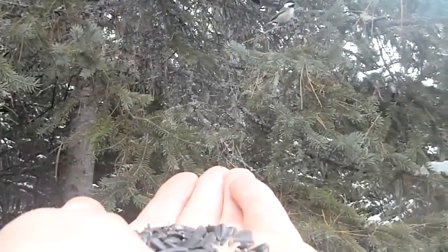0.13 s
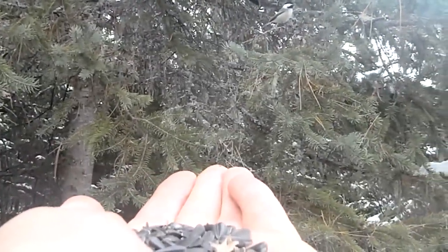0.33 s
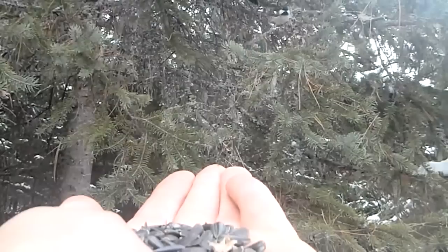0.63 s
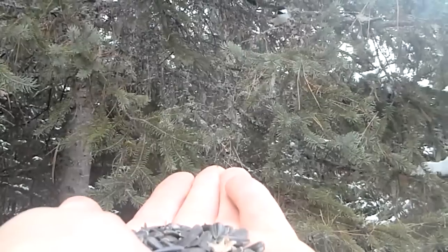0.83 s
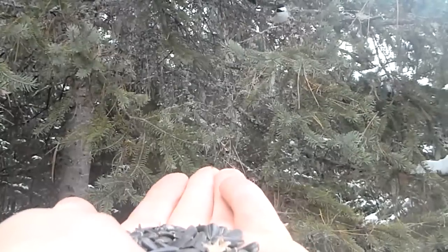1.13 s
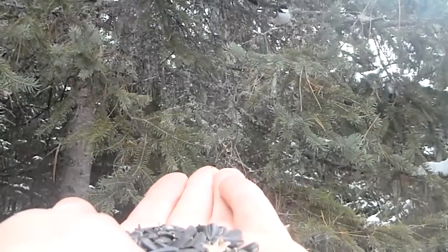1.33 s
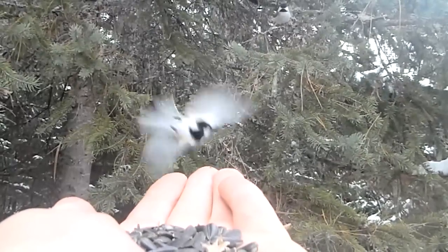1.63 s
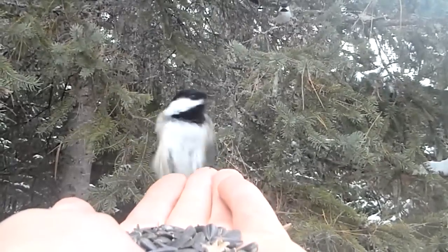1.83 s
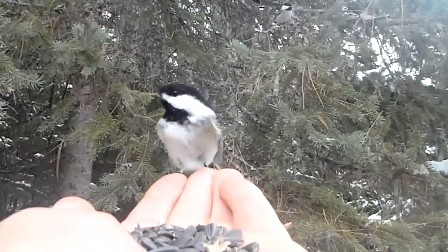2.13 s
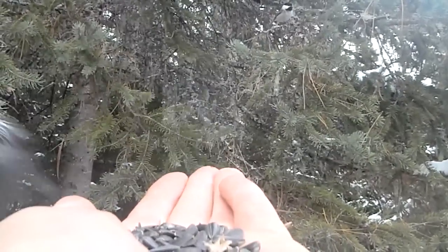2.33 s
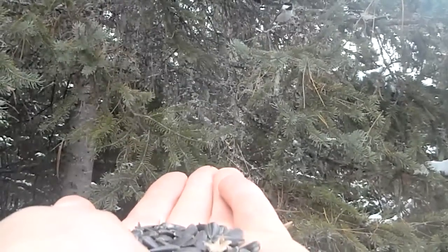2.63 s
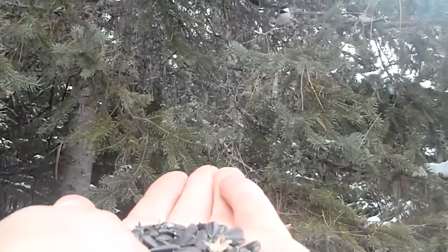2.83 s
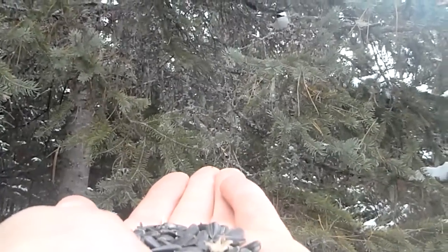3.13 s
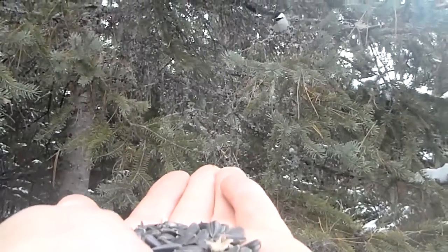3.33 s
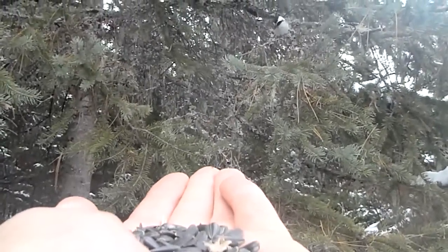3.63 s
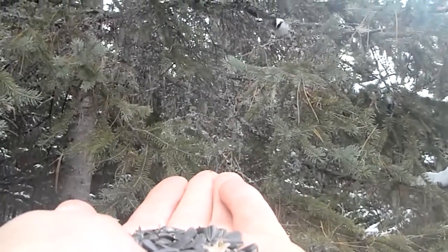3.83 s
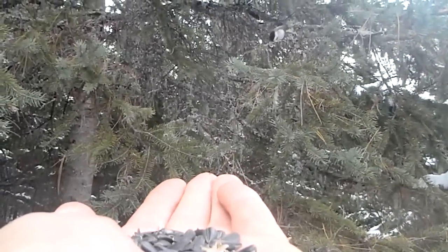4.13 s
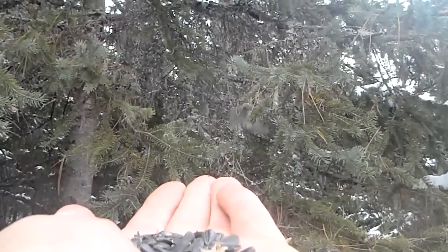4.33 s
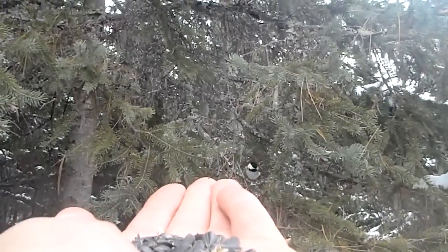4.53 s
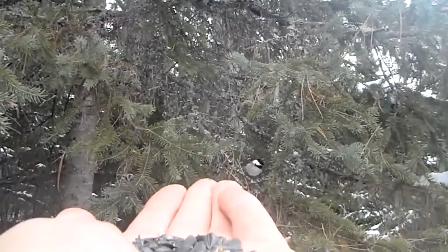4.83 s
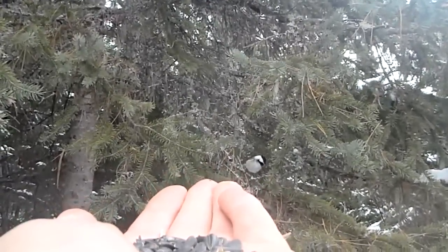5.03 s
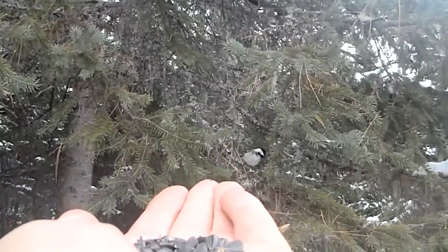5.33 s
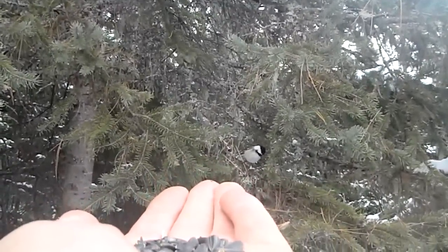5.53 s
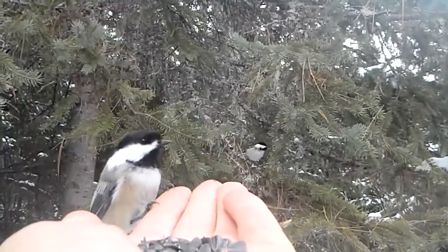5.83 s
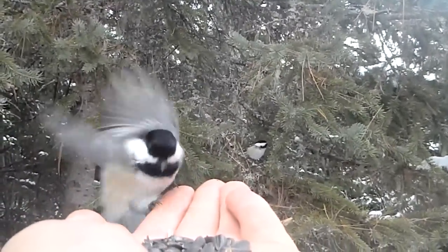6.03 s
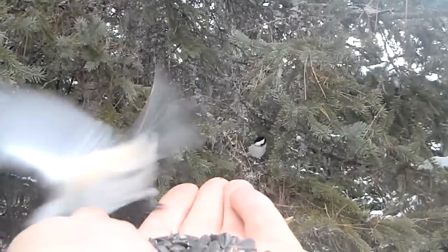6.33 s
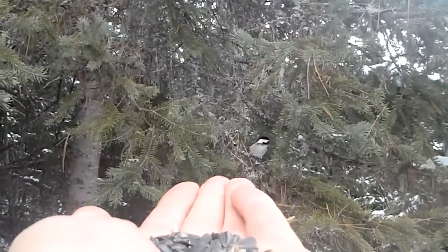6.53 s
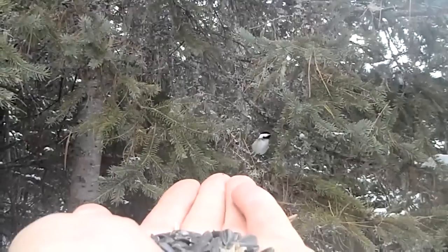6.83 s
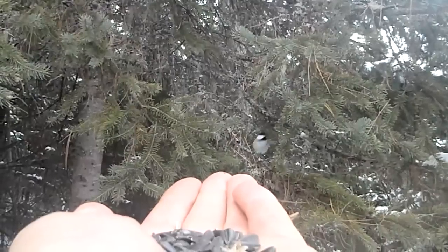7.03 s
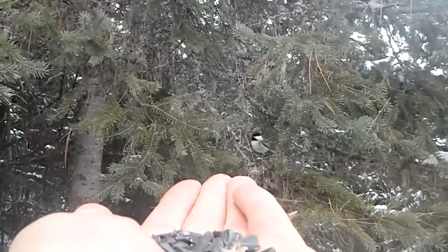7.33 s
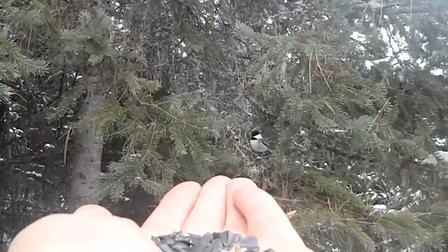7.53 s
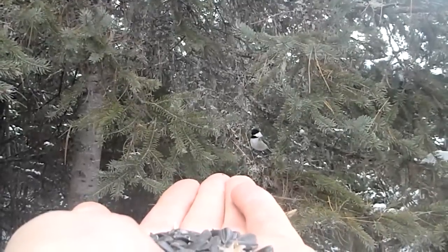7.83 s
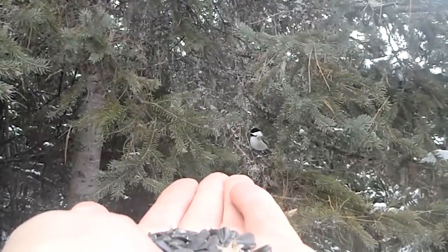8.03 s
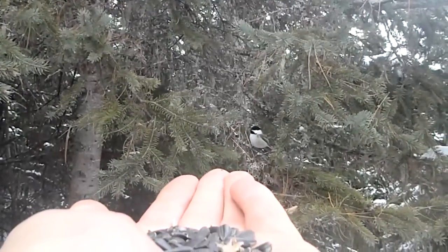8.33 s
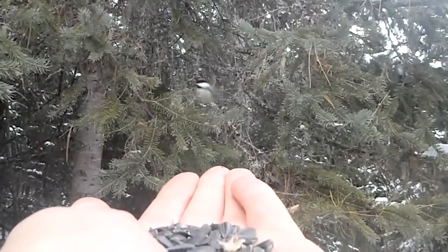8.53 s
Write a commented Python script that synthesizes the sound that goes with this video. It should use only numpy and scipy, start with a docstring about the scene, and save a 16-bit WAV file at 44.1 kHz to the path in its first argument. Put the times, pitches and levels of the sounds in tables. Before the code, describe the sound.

Short, high chirps from small birds scatter over a soft hiss, with a whirr of wings and a few sharp clicks.

```python
"""Chickadees call around a hand full of seed in a still, snowy spruce wood.
Each note is a membrane whistling in the syrinx: thin arched contact notes from the branches,
one quick gargle close by and a hoarse answer farther off. Feathers whirr at the hand, which bumps
softly, and a plastic camera body rings with two clicks. Trunks and boughs give birds and wings
a short tail; a soft hush with microphone hiss lies under it all."""
import sys
import numpy as np
from scipy import signal
from scipy.fft import rfft, irfft
from scipy.io import wavfile
from scipy.ndimage import uniform_filter1d

SR = 44100
rng = np.random.default_rng(int(sys.argv[2]) if len(sys.argv) > 2 else 0)


def persist_wave(psi):
    """Save psi, clipped to +-1, as 16-bit WAV."""
    counts = np.round(np.clip(psi, -1, 1) * 32767).astype(np.int16)
    wavfile.write(sys.argv[1], SR, np.atleast_2d(counts).T)


N = 382347
T = np.arange(N) / SR


# Arched calls: t/s, climb/s, fall/s, top f/Hz, end f/Hz, peak level/dB, top trim/dB, plunge trim/dB
CONTACT_NOTES = [ (1.105, 0.021, 0.033, 7300, 5130, -36.5, 0, -10),
                 (1.483, 0.039, 0.016, 7500, 4680, -39.5, -6, -11),
                 (1.900, .024, .008, 7050, 6000, -54.5, -1, -8),
                 (2.009, 0.024, 0.023, 7220, 4650, -36.5, -1.5, -6.5),
                 (3.987, 0.037, 0.01, 7700, 5270, -30, -11, -18),
                 (4.79, 0.021, 0.021, 7160, 4730, -35, -7, -9), (5.205, .024, .008, 7350, 6500, -57, 0, -5),
                 (5.590, .021, 0.022, 7190, 4680, -36.5, -3, -13),
                 (5.762, 0.043, .011, 7300, 4100, -39, -19, -6),
                 (6.036, 0.0247, 0.022, 7170, 4570, -38, -6, -12),
                 (6.889, .024, .022, 7220, 4440, -37, -7, -11),
                 (6.926, .04, .0065, 7090, 6600, -37, -4, -10),
                 (7.532, .024, .005, 7450, 7200, -51.5, 0, -4),
                 (7.843, .022, 0.023, 7460, 4420, -35, -6, -4.5)]
# Buzz on top of one call: t/s, length/s, start f/Hz, middle f/Hz, end f/Hz, level/dB, hoarseness
BUZZES = [(5.781, 0.053, 7450, 7370, 7250, -52, 0.54)]
def contact_calls():
    """Thin, high calls from the branches; one breaks into a buzz at its top."""
    arches = sum(arched_note(*row) for row in CONTACT_NOTES)
    return arches + sum(bent_note(*row, waver=.07) for row in BUZZES)


def arched_note(start, climb, fall, top_hz, end_hz, peak_db, top_db, plunge_db):
    """An arch: loudest early in the climb, softer over the top, then a quick plunge that levels out."""
    climb_hz_per_s, plunge_bend = 19300, 0.94   # mean climb rate; a bend under 1 plunges early
    onset_db, sag_db, dip_db = -7.0, -1.0, -2.0
    u = np.linspace(0, 1, 13)
    times = np.r_[start + climb * u, start + climb + fall * u]
    climb_hz = top_hz - climb_hz_per_s * climb * (1 - u) ** 2
    plunge = np.interp(u ** plunge_bend, [0, .25, .7, 1], [0, .1, .78, 1])
    fall_hz = top_hz - (top_hz - end_hz) * plunge
    climb_db = np.interp(u, [0, .3, .55, 1], [onset_db, 0, sag_db, top_db])
    fall_db = np.interp(u, [0, .2, .5, .8], [top_db, top_db + dip_db, plunge_db + dip_db, plunge_db])
    return syrinx(times, np.r_[climb_hz, fall_hz], peak_db + np.r_[climb_db, fall_db],
                  octave_db=-40, waver=.003, flutter_db=0.8)


# Breakpoints of the gargle's three loud whistles: t/s, f/Hz, level/dB
OPENING_WHISTLE = [(2.403, 7330, -40), (2.409, 6840, -27), (2.424, 6680, -19.5), (2.436, 6670, -20),
                   (2.445, 6200, -34), (2.456, 4500, -36.5), (2.469, 4420, -53)]
LONG_WHISTLE = [(2.5864, 5840, -26), (2.589, 5830, -23), (2.5912, 4950, -14.5), (2.598, 5590, -25),
                (2.624, 5575, -18.5), (2.6375, 5540, -21.5), (2.639, 5200, -21), (2.6435, 3780, -33)]
RISING_WHISTLE = [(2.698, 3700, -46), (2.6995, 4780, -25), (2.701, 4850, -26), (2.704, 5300, -35),
                  (2.711, 5940, -30.5), (2.720, 5880, -27), (2.7225, 5050, -23.5), (2.7245, 3900, -38)]
# Its short notes: t/s, length/s, start f/Hz, middle f/Hz, end f/Hz, level/dB, hoarseness, rasp level/dB
GARGLE_NOTES = [ (2.516, .010, 7900, 8500, 7700, -46, .1, -48),
                (2.526, 0.0084, 7700, 6950, 7100, -29.5, 0, -54),
                (2.5365, 0.002, 3000, 4400, 5600, -21, 0, -50),
                (2.5385, 0.0044, 7400, 5170, 4800, -23, .1, -40),
                (2.543, 0.018, 4640, 4240, 4250, -38.5, .2, -44),
                (2.570, 0.0076, 2400, 2200, 2000, -42, .9, -39),
                (2.682, 0.011, 3900, 3650, 3800, -43.5, .92, -54),
                (2.6955, 0.0038, 2500, 3120, 4000, -42, 1.1, -52),
                (2.707, .007, 4700, 4370, 4400, -40, .3, -50),
                (2.735, 0.009, 3300, 3130, 2950, -41, .3, -49),
                (2.747, .010, 3200, 3400, 3600, -44, .4, -54),
                (2.756, .028, 3640, 3820, 3840, -32.5, 0.14, -56),
                (2.786, 0.018, 2870, 2445, 1580, -51, 0.96, -47)]
def gargle():
    """The close bird: three clear whistles in a tumble of short, raspy notes."""
    whistles = sum(syrinx(*np.transpose(path), octave_db=-37.5, waver=.002, flutter_db=0.5)
                   for path in (OPENING_WHISTLE, LONG_WHISTLE, RISING_WHISTLE))
    return whistles + phrase(GARGLE_NOTES, waver=0.019)


# The answer: t/s, length/s, start f/Hz, middle f/Hz, end f/Hz, level/dB, hoarseness, rasp level/dB
REPLY_NOTES = [ (.243, .014, 5100, 5450, 5800, -51, .3, -64),
               (.263, 0.021, 4300, 4550, 4560, -39.5, .2, -58),
               (.276, 0.039, 3550, 3720, 3280, -47.5, 0.72, -52),
               (.350, .036, 7400, 8000, 7650, -58, .3, -68),
               (.4015, .008, 3100, 3350, 3700, -42.5, .2, -60),
               (.412, 0.022, 3210, 3160, 3130, -44.5, 0.54, -47.5),
               (.432, 0.042, 3090, 2930, 2320, -49, 0.41, -49.5),
               (.576, 0.043, 2270, 2110, 2060, -47, 0.67, -58)]
def far_reply():
    """A hoarse, falling phrase from deeper in the trees."""
    return phrase(REPLY_NOTES, waver=.044)


# EQ curve of the rasp in the voice: f/Hz, relative level/dB
RASP_EQ = [(1200, -10), (2100, -9.5), (3000, -6), (3800, -13), (4800, 5), (5400, -2), (6200, -14),
           (9000, -17), (14000, -26)]
def phrase(rows, waver):
    """A run of notes, each layered with a puff of rasping noise."""
    notes = sum(bent_note(*row[:-1], waver) for row in rows)
    puffs = [(start + length / 2, 0.36 * length, rasp_db) for start, length, *_, rasp_db in rows]
    return notes + swells(puffs) * noise(RASP_EQ)


def bent_note(start, length, start_hz, middle_hz, end_hz, db, hoarse, waver):
    """One pitch bend, loudest midway; hoarseness brings out the octave and shakes pitch and level."""
    edge_db, clear_octave_db = -6, -38
    hoarse = np.clip(hoarse, 0, 1)
    u = np.linspace(0, 1, 13)
    bend_hz = np.polyval(np.polyfit([0, .5, 1], [start_hz, middle_hz, end_hz], 2), u)
    envelope_db = db + edge_db * np.abs(2 * u - 1) ** 2.2
    return syrinx(start + length * u, bend_hz, envelope_db,
                  octave_db=clear_octave_db * (1 - hoarse), waver=waver * hoarse, flutter_db=2.8 * hoarse)


def syrinx(times, hz, db, octave_db, waver, flutter_db, fade_s=0.0012):
    """The voice: a membrane follows a pitch and level path, with a tremble and an octave overtone."""
    times = np.maximum.accumulate(times)
    span = (T >= times[0]) & (T <= times[-1])
    t, out = T[span], np.zeros(N)
    tremble = uniform_filter1d(rng.standard_normal((2, SR // 4)), size=90, axis=1)
    pitch_shake, level_shake = rms_one(tremble)[:, :len(t)]
    pitch_hz = np.interp(t, times, hz) * (1 + waver * pitch_shake)
    phase = 2 * np.pi * np.cumsum(pitch_hz) / SR
    gate = np.clip(np.minimum(t - times[0], times[-1] - t) / fade_s, 0, 1)
    level = gate * from_db(np.interp(t, times, db) + flutter_db * level_shake)
    out[span] = level * (np.sin(phase) + from_db(octave_db) * np.sin(2 * phase))
    return out


# Wing bursts, from a flick to a take-off: first beat t/s, length/s, nearest t/s, level when nearest/dB
FLUTTERS = [(1.735, .03, 1.735, -54), (1.835, .03, 1.833, -58), (2.038, .03, 2.04, -52),
            (5.878, .13, 5.915, -52), (6.298, .02, 6.30, -50), (6.504, .05, 6.49, -52),
            (6.561, .25, 6.622, -44)]
# EQ curve of brushing feathers: f/Hz, relative level/dB
FEATHER_EQ = [(1200, -8.5), (2500, -13), (3700, -11.5), (4700, 5), (5300, -3.5), (5900, -14), (9000, -16),
              (14000, -26)]
def wings():
    """Feathers brush past each other in evenly spaced swishes whose level follows the bird's distance."""
    beat_s, swish_width_s, uneven_db = 0.0379, 0.0063, 1.5
    approach_s, depart_s = 0.021, 0.029   # time the bird takes to fly its nearest distance
    beats = []
    for first, length, nearest, db in FLUTTERS:
        for s in np.arange(first, first + length, beat_s):
            distance = np.hypot(1, (s - nearest) / (approach_s if s < nearest else depart_s))
            beat_db = db + uneven_db * rng.standard_normal() - 20 * np.log10(distance)
            beats.append((s, swish_width_s, beat_db))
    return swells(beats) * noise(FEATHER_EQ)


# Small, sharp transients: t/s, level/dB, t60/s
CLAW_TICKS = [(2.039, -40, .003), (6.5008, -31, .002), (6.505, -26, 0.0024), (6.5075, -39, .004),
              (6.5935, -28.5, 0.0037), (6.634, -30, .004)]
def claw_ticks():
    """Claws and feathers tick: a brief bright ring with a broadband snap in it."""
    ring_hz, snap_db = 4800, -9
    t, out = T[:SR // 50], np.zeros(N)
    ring = np.sin(2 * np.pi * ring_hz * t)
    for start, db, t60 in CLAW_TICKS:
        at = round(start * SR)
        snap = from_db(snap_db) * rng.standard_normal(len(t))
        out[at:at + len(t)] += from_db(db - 60 * t / t60) * (ring + snap)
    return out


# Contacts on the camera body: t/s, gain/dB, low-pass f/Hz
CAMERA_HITS = [(6.1859, -2.5, 4830), (8.621, -10, 1850)]
# Resonances of its shell: f/Hz, level before filtering/dB, t60/s
SHELL_MODES = [(425, -34, 0.085), (694, -18.5, 0.04), (1090, -22, 0.0095), (1330, -13.5, 0.005),
               (1760, -20, 0.0091), (2035, -22, 0.013), (2850, -42, .007), (3720, -18, 0.009),
               (4250, -33, 0.021), (5300, -37, 0.0053)]
def camera_clicks():
    """A short contact sets the plastic body ringing; a softer one wakes mostly the lower modes."""
    body_band_hz, shell_top_hz = [454, 5000], 5430   # a small damped shell: no bass, no top
    t, out = T[:SR // 8], np.zeros(N)
    ring = sum(from_db(db - 60 * t / t60) * np.cos(2 * np.pi * hz * t) for hz, db, t60 in SHELL_MODES)
    ring = signal.sosfilt(signal.butter(3, body_band_hz, "band", fs=SR, output="sos"), ring)
    ring = lowpass(ring, shell_top_hz, order=6)
    for start, db, bright_hz in CAMERA_HITS:
        at = round(start * SR)
        hit = lowpass(ring, bright_hz)[:N - at]
        out[at:at + len(hit)] += from_db(db) * hit
    return out


# Bumps at the hand: centre t/s, width/s, level/dB
BUMPS = [(3.225, .008, -58), (3.408, .008, -56), (5.612, 0.0054, -50), (6.150, 0.012, -52),
         (6.400, 0.0088, -52), (6.521, .005, -41), (7.843, 0.012, -57), (8.405, .025, -56)]
# Their bass-heavy EQ curve: f/Hz, relative level/dB
BUMP_EQ = [(20, -14), (60, 0), (130, 1), (220, -5), (400, -16), (1000, -60)]
def hand_bumps():
    """Soft, dull bumps at the hand, each a short swell of low noise."""
    return swells(BUMPS) * noise(BUMP_EQ)


# EQ curve of the background bed: f/Hz, relative level/dB
HUSH_EQ = [(15, -40), (25, -15.5), (99, -9), (208, -2), (414, 0), (472, -0.5), (584, -1), (940, -3.5),
           (1160, -5), (1290, -5.5), (1730, -8), (4730, -11.5), (5400, -12.5), (8470, -13.5),
           (14000, -15.5)]
def hush():
    """The still wood and microphone hiss: one noise bed whose level barely wavers."""
    level_db, waver_db = -51, 0.4
    return from_db(level_db + waver_db * drift(rate_hz=6.1)) * noise(HUSH_EQ)


def wood_reverb(x, wet_db, t60):
    """Trunks and boughs scatter a faint, short tail behind the direct sound."""
    t = T[:SR // 2]
    scatter = rng.standard_normal(len(t)) * from_db(-60 * t / t60) * (t > .004)   # 4 ms pre-delay
    tail = signal.fftconvolve(x, scatter / np.linalg.norm(scatter))[:N]
    return x + from_db(wet_db) * tail


def swells(rows):
    """An envelope of bell curves; each width is a standard deviation."""
    return sum(from_db(db) * np.exp(-.5 * np.minimum(((T - centre) / width) ** 2, 200))
               for centre, width, db in rows)


def noise(eq):
    """Noise of rms 1, shaped by an EQ curve."""
    hz, db = np.transpose(eq)
    bins_hz = np.maximum(np.fft.rfftfreq(N, 1 / SR), 1)
    gain = from_db(np.interp(np.log(bins_hz), np.log(hz), db))
    return rms_one(irfft(rfft(rng.standard_normal(N)) * gain, N))


def drift(rate_hz):
    """Smooth random modulation of rms 1."""
    return rms_one(lowpass(rng.standard_normal(N + SR), rate_hz)[SR:])


def lowpass(x, hz, order=2):
    """Roll off the top."""
    return signal.sosfilt(signal.butter(order, hz, fs=SR, output="sos"), x)


def from_db(db):
    """Decibels to gain."""
    return 10 ** (np.asarray(db) / 20)


def rms_one(x):
    """Scale to an rms of 1."""
    return x / np.sqrt(np.mean(x ** 2) + 1e-20)


def scene():
    """Birds, wings and handling over the hush of the wood, the same in both channels."""
    background = hush() + hand_bumps()
    close = contact_calls() + gargle() + claw_ticks() + wings()
    near = wood_reverb(close, wet_db=-17.5, t60=0.089)
    far = wood_reverb(far_reply(), wet_db=-12, t60=0.13)   # distance brings more scatter
    mono = near + far + camera_clicks() + background
    return np.array([mono, mono])


def record(dry):
    """A steep high cut on the whole mix."""
    cutoff_hz = 14400
    return signal.sosfilt(signal.ellip(12, .1, 70, cutoff_hz, fs=SR, output="sos"), dry)


dry = scene()
out = record(dry)
persist_wave(out)
```